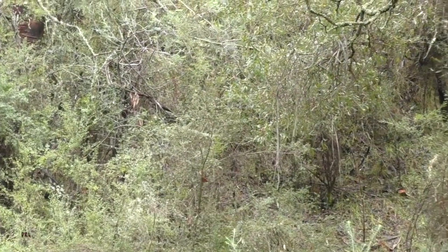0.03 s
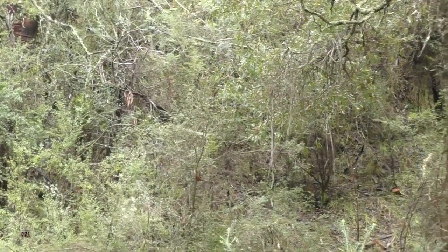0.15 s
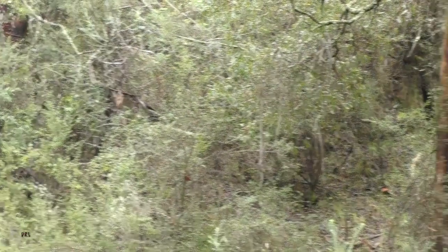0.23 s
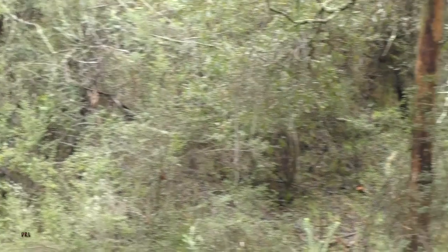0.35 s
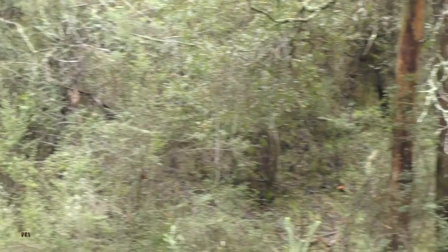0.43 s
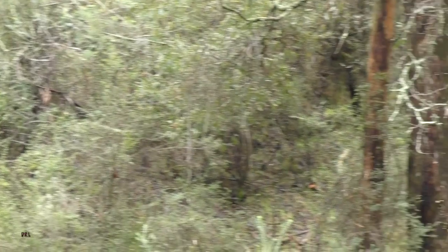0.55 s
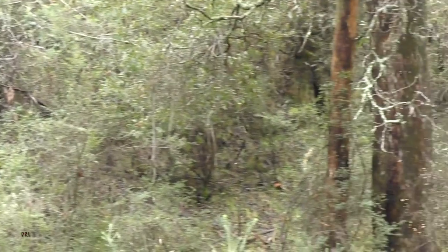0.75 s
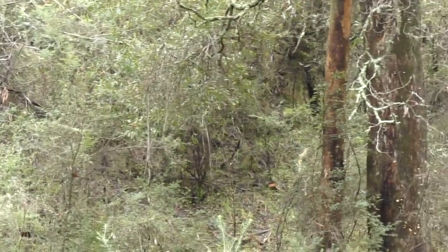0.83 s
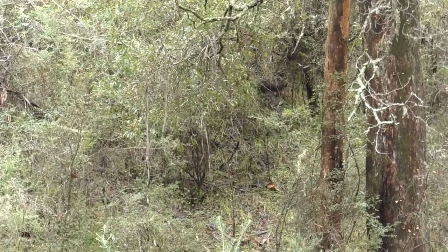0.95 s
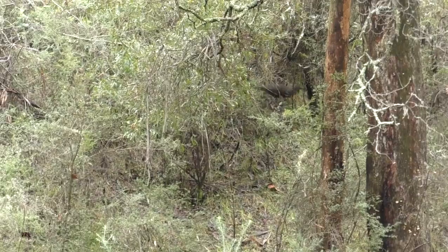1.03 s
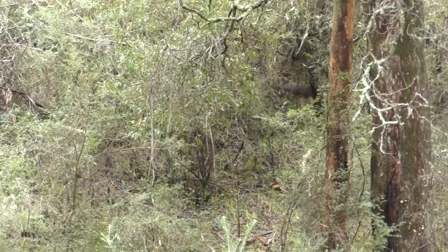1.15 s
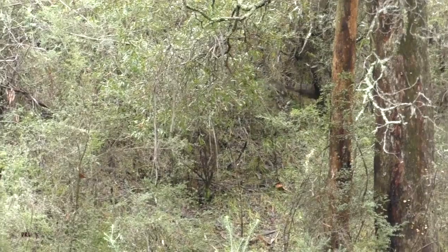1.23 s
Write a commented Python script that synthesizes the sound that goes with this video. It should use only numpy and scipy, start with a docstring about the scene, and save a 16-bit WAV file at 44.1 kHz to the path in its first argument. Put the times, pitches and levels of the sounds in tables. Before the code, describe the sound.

A lyrebird clicks twice in dense bush, straight ahead. At about 0.2 seconds comes a hollow pop, followed instantly by a higher, drier snap; the pair repeats at about 0.7 to 0.8 seconds. Each click leaves a soft, short forest echo. A few much fainter ticks fall around them, until about 1.1 seconds. A quiet, steady rush with distant rumble and light hiss continues throughout.

```python
"""Lyrebird clicking in dense bush

Straight ahead of a stereo microphone, a lyrebird gives two double clicks: a low, hollow pop and,
57 ms later, a higher, drier snap; a faint, low click leads into the second snap. Ground, trunks and
foliage scatter each into a soft forest tail. Around the bird are a distant rumble, the steady rush
of the bush and a few faint clicks; close up, one small tick and the hiss of the microphone."""
import sys
import numpy as np
from scipy import signal
from scipy.fft import rfft, irfft, next_fast_len
from scipy.io import wavfile
from scipy.ndimage import map_coordinates

SR = 44100
rng = np.random.default_rng(int(sys.argv[2]) if len(sys.argv) > 2 else 0)


def to_wav(sig):
    """Store sig (one row per channel, or 1-D mono) as 16-bit WAV at the path in sys.argv[1].

    Samples outside -1..1 are clipped; the rate is SR.
    """
    pcm = np.clip(np.atleast_2d(sig), -1, 1) * 32767
    pcm = np.round(pcm).astype(np.int16)
    wavfile.write(sys.argv[1], SR, pcm.T)  # frames by channels


N = 57330

# how alike the bush's echoes are left and right: f/Hz, correlation
ECHO_LIKENESS = [(500, 0.49), (1500, 0.82), (3000, 0.71), (8000, 1)]
# how alike hiss and tick are left and right: f/Hz, correlation
HISS_LIKENESS = [(3000, 0.23), (8000, 1), (13000, 0.29)]


def amp(db):
    """Decibels to gain."""
    return 10 ** (np.asarray(db) / 20)


def unit(x):
    """x scaled to rms 1."""
    return x / np.sqrt(np.mean(x ** 2) + 1e-20)


def along(points, hz):
    """A curve through (f/Hz, value) points, read on a log frequency axis."""
    f, v = np.transpose(points)
    return np.interp(np.log(hz + 1), np.log(f + 1), v)


def wobble(rate):
    """A smooth random curve with `rate` knots a second."""
    knots = rng.standard_normal(int(N * rate / SR) + 4)
    return map_coordinates(knots, [np.arange(N) * rate / SR])


def filtered(x, response):
    """x through a filter given as a function of frequency."""
    m = next_fast_len(N + SR // 2)
    return irfft(rfft(x, m) * response(np.fft.rfftfreq(m, 1 / SR)), m)[..., :N]


def delayed(x, seconds):
    """x, arriving later."""
    return filtered(x, lambda hz: np.exp(-2j * np.pi * hz * seconds))


def noise(likeness, colour):
    """Coloured stereo noise of rms 1; the mid-side balance sets the left-right likeness."""
    def mid_side_gains(hz):
        angle = np.arccos(np.clip(along(likeness, hz), -1, 1)) / 2
        return amp(along(colour, hz)) * [np.cos(angle), np.sin(angle)]
    mid, side = filtered(rng.standard_normal((2, N)), mid_side_gains)
    return unit(np.array([mid + side, mid - side]))


def swell(t, rise_s, fall_s):
    """A rounded peak at t = 0 with its own rise and fall times."""
    return 1 / np.cosh(np.clip(np.pi / 2 * t / np.where(t < 0, rise_s, fall_s), -20, 20))


def click(row, fall_over_rise, glide, overtone_slope_db):
    """A few cycles of tone with weak overtones, rising from 1 - glide to 1 + glide times its pitch."""
    peak_s, hz, db, rise_s, overtone_db = row
    t = np.arange(N) / SR - peak_s
    envelope = swell(t, rise_s, rise_s * fall_over_rise)
    phase = 2 * np.pi * hz * (t + glide * np.hypot(t, 0.0012))
    overtones = sum(amp(overtone_db + overtone_slope_db * k) * np.sin((k + 2) * phase) for k in range(3))
    return amp(db) * envelope * (np.sin(phase) + envelope * overtones)


def scatter(grain, energy_db, onset_s, t60_s):
    """Dense echoes that build up and die away, with a set total energy."""
    t = np.arange(N) / SR
    build_up = 1 - np.exp(-(t / onset_s) ** 2)
    decay = np.exp(-np.log(1000) * t / t60_s)
    return amp(energy_db) * unit(grain * build_up * decay) / np.sqrt(N)


def bush(x, twigs_db, trunks_db, forest_db, ground_db=-25):
    """Direct sound, ground bounce and three depths of scatter, each trimmed from its base level."""
    # spectra of the scatter from trunks and from the deeper forest: f/Hz, level/dB
    trunk_colour = [(800, -15), (1600, 5), (2600, -2.5), (4000, 5), (6200, 10), (9000, 10), (14000, -13)]
    forest_colour = [(500, -16), (1500, 0.5), (2500, -6), (4000, -2), (6500, 7.5), (12000, 0.5)]
    twigs = scatter(noise(ECHO_LIKENESS, [(100, 0), (10000, 0)]),  # white
                    twigs_db - 17, onset_s=0.0015, t60_s=0.035)
    trunks = scatter(noise(ECHO_LIKENESS, trunk_colour), trunks_db - 9.5, onset_s=0.002, t60_s=0.21)
    forest = scatter(noise(ECHO_LIKENESS, forest_colour), forest_db - 8.5, onset_s=0.042, t60_s=0.68)
    bounce = amp(ground_db) * delayed(x, seconds=0.0017)
    tail = signal.fftconvolve(x[None], twigs + trunks + forest, axes=1)[:, :N]
    return x + bounce + tail


def background():
    """Distant rumble and the rush of the bush, both barely wavering, over even microphone hiss."""
    # spectra of the three noises: f/Hz, level/dB
    rumble_colour = [(20, -16), (45, -7.5), (80, -5), (140, -5), (205, 3), (265, -3), (380, -3.5),
                     (560, -17.5), (900, -23.5), (2000, -56)]
    rush_colour = [(300, -22), (600, -8), (720, -2), (830, -8), (1100, -1), (1550, -1), (2100, -2),
                   (3000, -5.5), (4200, -13), (6500, -29.5), (12000, -42)]
    hiss_colour = [(500, 0.37), (4000, -0.7), (8000, -2.6), (12000, 1), (15500, -0.71)]
    # how alike rumble and rush are left and right: f/Hz, correlation
    rumble_likeness = [(40, 0.14), (200, 0.53), (600, 0.68)]
    rush_likeness = [(600, 0.19), (1500, 0.72), (4000, 0.6)]
    rumble = amp(-59 + 0.55 * wobble(10.7)) * noise(rumble_likeness, rumble_colour)
    rush = amp(-57 + 0.45 * wobble(6.95)) * noise(rush_likeness, rush_colour)
    hiss = amp(-64.5) * noise(HISS_LIKENESS, hiss_colour)
    lean_right = amp([[-0.3], [0.3]])
    return (rumble + rush) * lean_right + hiss


def faint_clicks():
    """Four faint clicks; the third is a low lead-in just before the lyrebird's second snap."""
    # one click a row: t/s, f/Hz, peak level/dB, rise/s, overtone level/dB
    clicks = [(.111, 3840, -59, .0012, -30), (.593, 1530, -49.5, 0.00084, -28),
              (0.7886, 1360, -44, 0.00094, -30), (1.075, 1680, -51, 0.0014, -33)]
    dry = sum(click(row, fall_over_rise=1.5, glide=0.027, overtone_slope_db=-12) for row in clicks)
    return bush(dry, twigs_db=17, trunks_db=-6, forest_db=2)


def near_tick():
    """One faint, bright tick of noise close to the microphone."""
    # spectrum of the tick: f/Hz, level/dB
    tick_colour = [(2000, -35), (4000, -7), (7500, -3.5), (9000, -12), (11000, -11), (13300, -20),
                   (14500, -1), (15800, -19)]
    peak_s, width_s = 0.9065, 0.0016
    t = np.arange(N) / SR - peak_s
    envelope = np.exp(-(t / width_s) ** 2 / 2)
    return amp(-52) * envelope * noise(HISS_LIKENESS, tick_colour)


def lyrebird_pops():
    """The low, hollow pops; the harder first one has a noisy edge and comes back from single trunks."""
    # one pop a row: t/s, f/Hz, peak level/dB, rise/s, overtone level/dB
    pops = [(0.2155, 1640, -21.5, 0.00088, -32), (0.7345, 1654, -23, 0.00049, -23.5)]
    # spectrum of the first pop's bright edge: f/Hz, level/dB
    edge_colour = [(2500, -4), (3300, -2), (4200, 8.5), (4600, -5), (5300, -31), (6150, -6.5), (7000, -24),
                   (8000, -13.5), (9000, -23), (14000, -31)]
    # returns from single trunks: delay/s, level/dB
    trunk_echoes = [(.0047, -20), (0.0123, -19), (0.0119, -16), (.017, -18), (0.0227, -20)]
    hard, soft = (click(row, fall_over_rise=1.45, glide=0.14, overtone_slope_db=-4) for row in pops)
    t = np.arange(N) / SR - pops[0][0]
    edge_noise = noise(ECHO_LIKENESS, [(1500, -25)] + edge_colour)[0]
    edge = amp(-40) * swell(t, rise_s=0.0006, fall_s=0.0024) * edge_noise
    echoes = sum(amp(db) * delayed(hard, delay) for delay, db in trunk_echoes)
    bodies = sum(bush(pop, twigs_db=0, trunks_db=1, forest_db=-1.5) for pop in (hard, soft))
    return bodies + echoes + bush(edge, twigs_db=10.5, trunks_db=2, forest_db=4)


def lyrebird_snaps():
    """The higher, shorter snaps, which scatter more widely in the foliage."""
    # one snap a row: t/s, f/Hz, peak level/dB, rise/s, overtone level/dB
    snaps = [(.2715, 2520, -26, 0.00036, -19), (0.7917, 2630, -23, 0.00026, -22.5)]
    dry = [click(row, fall_over_rise=1.1, glide=0.036, overtone_slope_db=-13) for row in snaps]
    return sum(bush(snap, twigs_db=8, trunks_db=5.5, forest_db=8.5, ground_db=-9) for snap in dry)


def scene():
    """The bird straight ahead of the microphone, the bush all around."""
    return lyrebird_pops() + lyrebird_snaps() + faint_clicks() + near_tick() + background()


def record(dry):
    """The recorder keeps nothing above its band limit."""
    top_hz = 15850
    return filtered(dry, lambda hz: hz <= top_hz)


dry = scene()
out = record(dry)
to_wav(out)
```